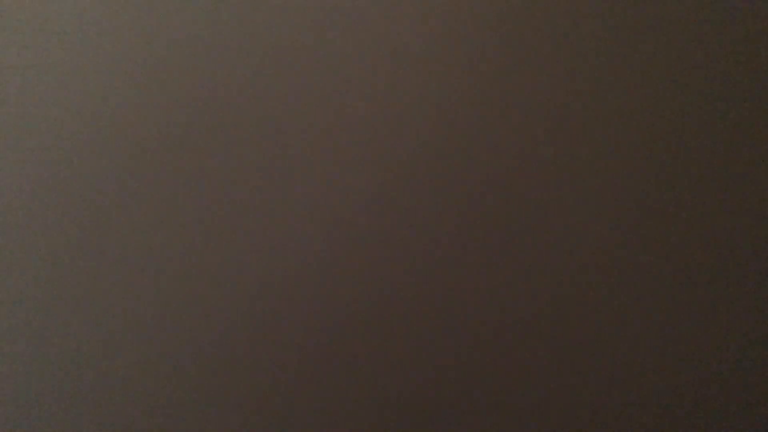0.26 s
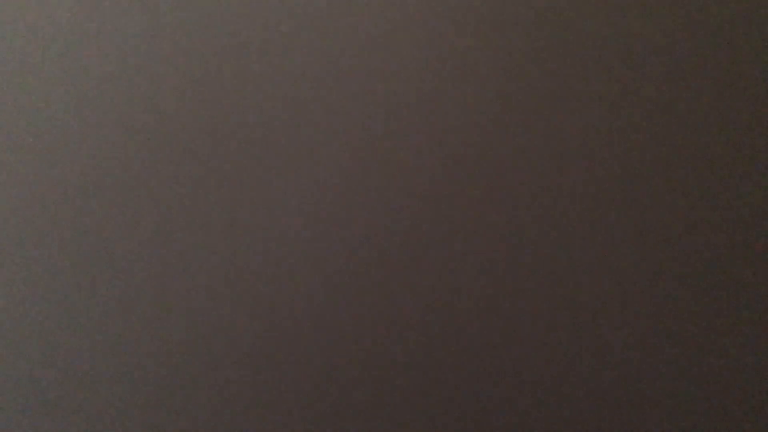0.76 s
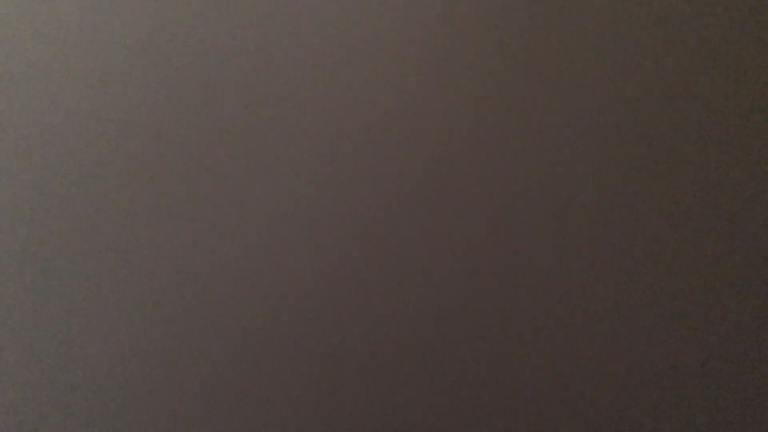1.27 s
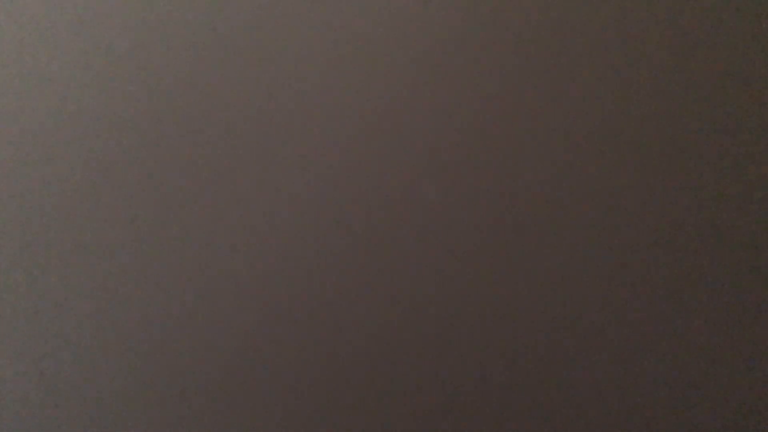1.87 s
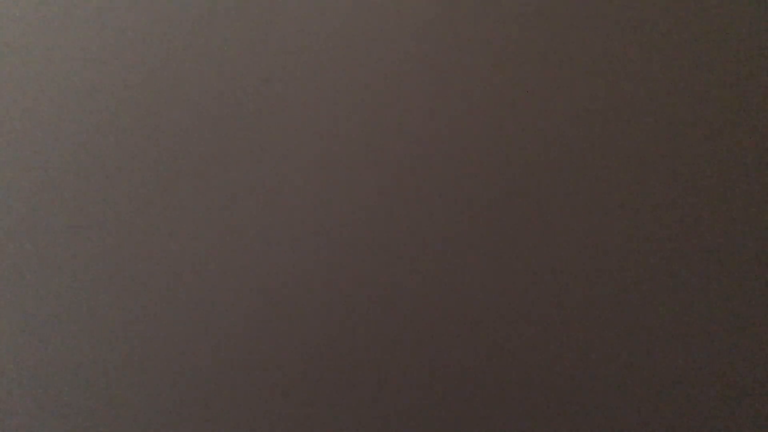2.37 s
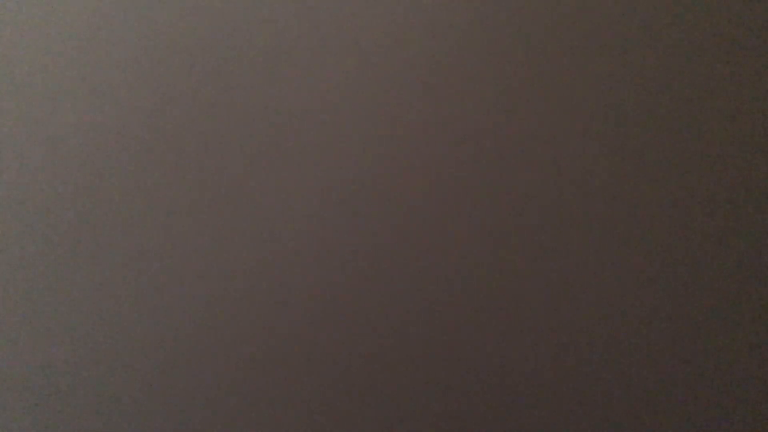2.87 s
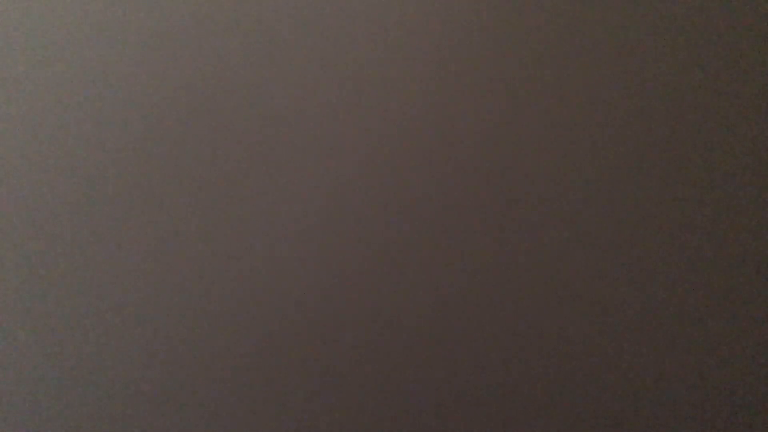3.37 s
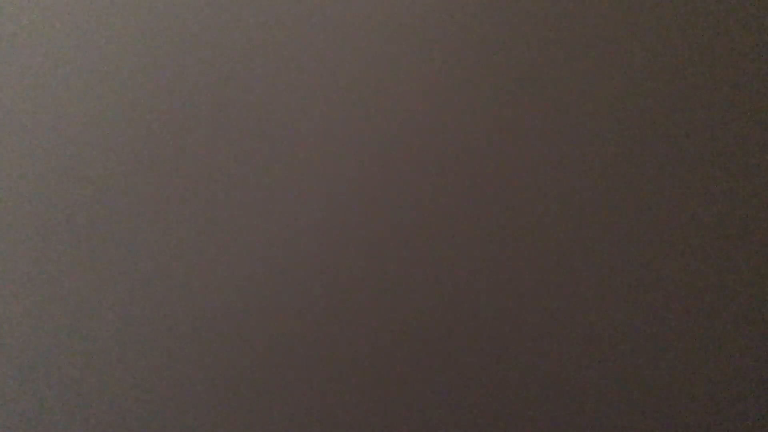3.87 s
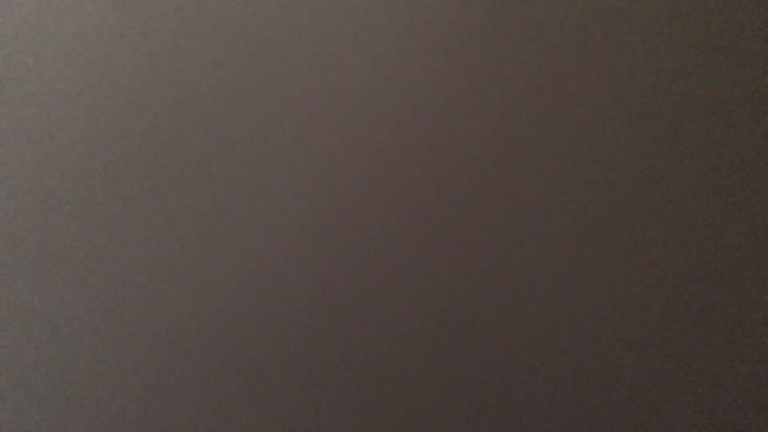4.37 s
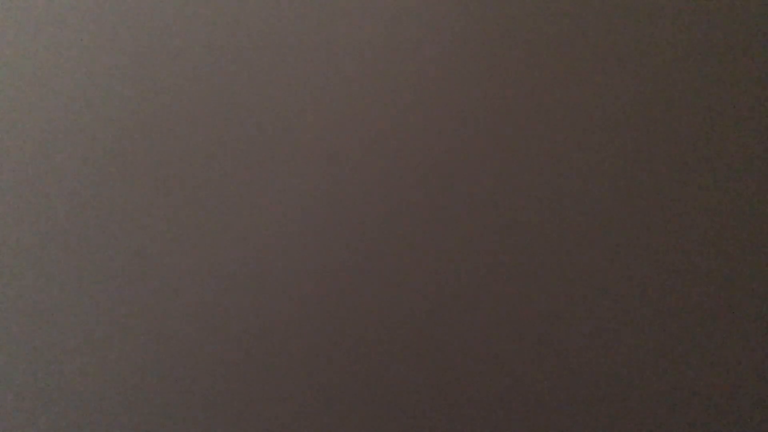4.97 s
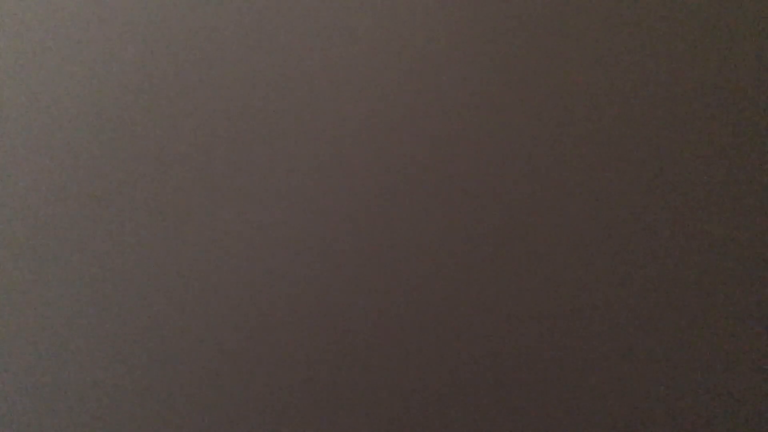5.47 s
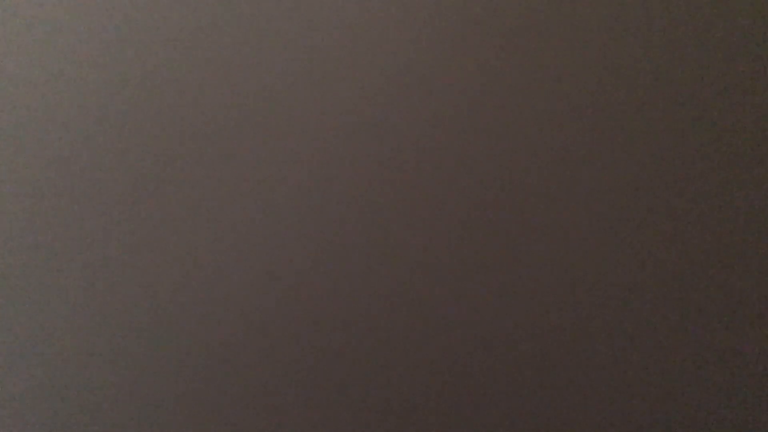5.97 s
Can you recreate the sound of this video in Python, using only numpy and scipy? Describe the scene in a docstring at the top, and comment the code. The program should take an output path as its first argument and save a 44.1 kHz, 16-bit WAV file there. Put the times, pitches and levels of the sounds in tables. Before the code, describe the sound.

Close to the microphone in a quiet small room, two tiny ticks precede a hard, loud snap as a plastic case's catch lets go, with a low thump and brief bright ring. Faint ticks and soft rubbing follow. Later a sharp crack starts busier handling: crinkling wrap, hollow knocks, finger drags, short squeaks and a dense cluster of clicks, ending in rubbing, scraping and soft thuds.

```python
"""Two faint ticks in the still air of a small room, then a hard snap: the catch of a plastic disc case lets go,
close to the microphone, and its shell flexes. Then hands work at it: thin wrap crinkles, fingers drag and
squeak over the shell, and its edges tick, scrape and knock. Cracks are pulses coloured by the hollow shell;
wrap and skin are swarms of such slips with noise; the panels are gliding tones and low rumble.
Diffuse echoes place the case in the room."""
import sys
import numpy as np
from scipy import signal
from scipy.fft import rfft, irfft
from scipy.io import wavfile
from scipy.ndimage import uniform_filter1d

SR = 44100
rng = np.random.default_rng(int(sys.argv[2]) if len(sys.argv) > 2 else 0)


def bounce(signal):
    """Save signal as a 16-bit WAV file at the path given by the first command-line argument."""
    frames = np.transpose(np.atleast_2d(signal))
    limited = np.clip(frames, -1, 1)
    pcm = np.round(limited * 32767).astype(np.int16)
    wavfile.write(sys.argv[1], SR, pcm)


N = 275071
TIME = np.arange(N) / SR

# Colour of the still air in the room. Each row: frequency in Hz, relative level in dB.
AIR_COLOUR = [(15, -0.5), (42, -10.5), (96, 6), (170, -10.5), (330, -17.5), (480, -20.5), (650, -16.5),
              (800, -21), (2000, -24.5), (9000, -34.5), (16000, -37)]
AIR_DB = -63
# Decay of the room. Each row: frequency in Hz, time to fall by 60 dB in seconds.
ROOM_DECAY = [(150, 0.2), (700, 0.4), (3000, 0.39), (6000, 0.45), (15000, 0.41)]
WALL_MIX_S = 0.19  # by then the echoes have grown fully dense

# Resonances of the hollow case. Each row: frequency in Hz, width in Hz, relative level in dB.
SHELL_RESONANCES = [(260.3, 250, 2.5), (610, 77, 9), (666, 23, 11), (990, 140, 4), (1228, 150, 1.5),
                    (1676, 51, 2), (2240, 390, 1.5), (3285, 150, 6.5), (3930, 260, 6.5), (5860, 600, 3.5)]
GRIP_DETUNE = 0.036  # the changing grip moves the resonances by this share
FOCUS_DB, FOCUS_OCTAVES = 8.5, 0.32  # each spot of the plastic favours its own band
BEND_LAG_S = 0.000819  # travel time of a 900 Hz bending wave across the panel

# Colours of the sounds at the case. Each row: frequency in Hz, relative level in dB.
SNAP_COLOUR = [(100, -26.5), (270, 2), (430, -12), (1300, -5), (2000, -2.5), (3600, -1), (6300, -6),
               (8000, -11.5), (12000, -15.5), (16000, -26.5)]
CLICK_COLOUR = [(60, -16), (270, 9), (430, 12.5), (800, 11), (2000, 8.5), (3000, 0.5), (6000, -9),
                (9000, -14), (12500, -14), (16000, -19)]
WRAP_COLOUR = [(200, -13.5), (900, 11.5), (2000, 5), (3800, 4.5), (5000, -0.5), (7000, -3.5), (9000, -0.5),
               (10300, -9.5), (12000, -3.5), (16000, -43)]
DRAG_COLOUR = [(80, -3), (300, 3.5), (430, -3.5), (650, 0), (950, -2), (1350, -7.5), (2200, -13),
               (4000, -22.5), (12000, -36)]
FLEX_COLOUR = [(15, -39), (28, -6), (42, 3.5), (75, 0.5), (130, -1), (200, -10.5), (300, -14), (450, -24),
               (1000, -33.5), (4000, -71)]

# The held case: a slight steady stir.
HOLD_FROM_S, HOLD_FLEX_DB = 0.65, -65.5
RATTLE_PER_S, RATTLE_DB = 14, -73

# Squeezes that bend the panels. Each row: start in seconds, length in seconds, level in dB.
SQUEEZES = [(0.69, 0.29, -43.5), (1.63, 0.026, -49), (2.765, 0.08, -47), (2.985, 0.17, -45.5),
            (3.34, 0.035, -49), (3.51, 0.086, -46), (3.72, 0.12, -44.5), (4.09, 0.029, -37.5),
            (4.9, 0.085, -46), (5.25, 0.021, -38), (5.47, 0.37, -50.5), (6.16, .08, -43.5)]
SQUEEZE_ATTACK_S, SQUEEZE_RELEASE_S = 0.0074, 0.083
# The shell flexing like a drum skin. Each row: start in seconds, peak level in dB, first pitch in Hz,
# last pitch in Hz, rise in seconds, time to fall by 60 dB in seconds.
THUMPS = [(0.476, -10, 135, 92, 0.014, 0.014), (0.483, -24, 81.5, 80, 0.0024, 0.21),
          (0.483, -25.5, 45.2, 44, 0.015, 0.27), (0.757, -27.5, 42, 40, 0.073, 0.35),
          (1.075, -30.5, 91, 63, 0.012, 0.049), (1.237, -32, 110, 81, 0.008, 0.036),
          (1.635, -39.5, 206.6, 129.4, 0.014, 0.65), (1.668, -32.5, 107, 72, 0.03, 0.34),
          (1.812, -38, 72, 51.8, 0.012, 0.55), (3.514, -36.5, 133, 129.6, 0.0063, 0.22),
          (3.705, -24, 156.4, 85, 0.026, 0.042), (3.752, -31, 69, 53, 0.019, 0.12),
          (4.099, -28.5, 144, 110, 0.0063, 0.24), (4.898, -27, 59, 54, 0.015, 0.11),
          (5.454, -32.5, 198, 122, 0.012, 0.039), (6.197, -28.5, 143, 96, 0.017, 0.043)]
# Short hollow notes of the shell: soft pushes of a finger pad, and the low body under the cracks at # 1.18,
# 2.77, 3.0 and 5.28 s. Each row: start in seconds, peak level in dB, pitch in Hz.
HOLLOW_NOTES = [(1.178, -38, 227), (1.277, -45, 705), (1.64, -51.5, 319), (1.864, -52, 655), (1.88, -51.5, 672),
                (1.978, -47, 637), (2.041, -48, 860), (2.211, -54, 672), (2.251, -56, 660), (2.6, -73, 680),
                (2.765, -33, 253), (2.849, -37, 662), (3, -42.5, 425), (3.356, -44, 630), (3.571, -38, 610),
                (5.282, -34.5, 305), (5.307, -42.5, 957), (5.348, -43.5, 1028), (5.377, -44, 775),
                (5.407, -41.5, 650), (5.529, -37.5, 935), (5.546, -34, 663), (5.684, -32.5, 661),
                (5.745, -35.5, 672), (5.787, -40, 700), (5.92, -39, 633), (6.131, -39.5, 747), (6.2, -33, 667)]
NUDGE_RISE_S, NUDGE_OVERTONE_DB = 0.0049, -18  # each overtone, against the note

# Soft taps on the hollow shell. Each row: start in seconds, level in dB over the first 4 ms,
# brightness in dB per octave, favoured band in Hz.
KNOCKS = [(1.0726, -44.5, 4.5, 1390), (1.1789, -35.5, -2.5, 1310), (2.7705, -42, -18, 607),
          (3.5231, -37.5, -1, 1090), (3.7041, -38, -3.5, 590), (4.8837, -32.5, 2.5, 895),
          (5.4572, -36, -14, 1040), (5.5069, -38, -5, 1010), (5.5769, -38, -2, 910)]
# Strokes of a finger over the shell. Each row: start in seconds, length in seconds, level in dB.
RUBS = [(0.85, 0.17, -62), (1.185, 0.054, -53.5), (1.975, 0.087, -63.5), (2.56, 0.51, -67),
        (2.78, 0.083, -59.5), (2.995, 0.008, -39), (3.05, 0.089, -49), (3.23, 0.19, -53.5),
        (3.955, 0.16, -52.5), (4.09, 0.032, -48.5), (4.265, 0.2, -52.5), (4.55, 0.082, -48.5),
        (4.68, 0.12, -40), (4.87, 0.14, -48), (5.1, 0.28, -62.5), (5.279, 0.039, -47.5), (5.34, 0.049, -51),
        (5.45, 0.081, -52.5), (5.505, 0.31, -51), (5.88, 0.45, -47.5)]
RUB_ATTACK_S, RUB_RELEASE_S = 0.0011, 0.036  # the finger takes hold; the slipping dies away by 1 / e
FLEX_PER_RUB_DB, WRAP_PER_RUB_DB = -5, -12.5  # every stroke also shakes the panels and stirs the wrap
FIT_S, FIT_DB = 0.012, 4.5  # wrap and fingers give way in fits of about this length, with lulls between

# A brief scuff starts just before a tap, crack or nudge; its level is against that hit.
SCUFF_LEAD_S, SCUFF_S = 0.008, 0.02
SCUFF_RISE_S, SCUFF_FALL_S = 0.004, 0.013
KNOCK_SCUFF_DB, CLICK_SCUFF_DB, NUDGE_SCUFF_DB = -9.5, -28, -15.5

# A skidding fingertip squeaks. Each row: start in seconds, length in seconds, level in dB,
# first pitch in Hz, last pitch in Hz.
SQUEAKS = [(3.228, 0.061, -50.5, 636, 1810), (4.867, 0.032, -40, 857, 926),
           (5.339, 0.0557, -44.5, 1023, 717)]
SQUEAK_WIDTH_HZ = 370
# Edges scraping over the plastic. Each row: start in seconds, length in seconds, level in dB, band in Hz.
SCRAPES = [(0.763, 0.3, -69.5, 4760), (1.163, 0.0048, -57, 1230), (1.223, 0.0095, -47.5, 1940),
           (2.01, 0.18, -74.5, 4040), (4.281, 0.16, -59.5, 1710), (4.564, 0.083, -56, 2100),
           (4.696, 0.064, -55, 1050), (4.951, 0.031, -50.5, 2680), (5.281, 0.0085, -57, 3180),
           (5.449, 0.067, -51, 1190), (5.975, 0.091, -51.5, 1550), (6.196, 0.034, -51.5, 1890)]
SCRAPE_ATTACK_S, SCRAPE_RELEASE_S = 0.007, 0.001
SCRAPE_PER_S, SCRAPE_SPREAD_DB = 1100, 1  # mean rate of the catches and scatter of their strength
SCRAPE_WIDTH = 0.35  # half-width of the band as a share

# Spells of crumpling the wrap. Each row: start in seconds, length in seconds, level in dB.
CRUMPLES = [(0.72, 0.24, -76), (2.77, 0.21, -63.5), (3.0, 0.2, -58.5), (3.18, 0.17, -65.5),
            (3.91, 0.044, -61.5), (4.115, 0.076, -59), (4.3, 0.29, -55.5), (4.575, 0.25, -57.5),
            (4.945, 0.102, -54.5), (5.52, 0.21, -68), (6.0, 0.074, -58.5), (6.09, 0.27, -62)]
CRUMPLE_ATTACK_S, CRUMPLE_RELEASE_S = 0.00072, 0.004
BUCKLE_PER_S, BUCKLE_DB = 70, 2.5  # the few larger creases; level against the many tiny ones
# Sharp ticks and cracks of the plastic. Each row: start in seconds, level in dB over the first 4 ms,
# brightness in dB per octave, favoured band in Hz.
CLICKS = [(0.2398, -58, 4.5, 3500), (0.3155, -56.5, -0.5, 4800.0), (0.6804, -50.5, 6, 6560),
          (0.7029, -48, 9, 4700), (0.8347, -55.5, 4, 4120), (1.0355, -54.5, 3.5, 4800.0),
          (1.1675, -49.5, 1, 5800), (1.2042, -48.5, 1, 6000), (1.7777, -58.5, 3, 5660),
          (2.0588, -55.5, 4.5, 3990), (2.0773, -52, 4.5, 4870), (2.362, -61, 4, 4020),
          (2.3852, -59.5, 4, 9100), (2.7676, -28, 2, 9230), (2.7775, -45, 6, 6000),
          (2.8479, -43.5, 1, 1280), (2.8976, -46.5, 2.5, 3440), (2.9991, -31.5, 3, 1740),
          (3.0095, -35, 3.5, 5100), (3.0154, -37, 0.5, 5740), (3.1128, -47, 12, 1430.0),
          (3.138, -47.5, 11, 7100), (3.4676, -49.5, 7, 710.0), (3.6612, -49.5, 1, 3500),
          (3.8538, -41.5, 3.5, 4730), (3.9883, -38.5, 2, 2000), (4.0324, -49.5, 7.5, 9800),
          (4.0935, -29, 1.5, 1000), (4.1187, -27.5, 6.5, 680), (4.1251, -27, 7, 840),
          (4.1406, -34.5, 4.5, 673), (4.1832, -41.5, 6, 9500), (4.232, -45, -1, 3300),
          (4.27, -38.5, 2.5, 1220), (4.3226, -43, 5, 840), (4.3277, -44.0, 4, 9500),
          (4.3465, -49, -3.5, 1800), (4.3765, -40, -7, 1200), (4.4355, -43, 4.5, 600.0),
          (4.4791, -42, 3, 706), (4.5528, -46.5, 8, 1400), (4.5997, -39.5, 3.5, 3960),
          (4.6455, -39.5, 5, 2520), (4.6578, -33, -2.5, 1000), (4.7503, -32, 6, 1000),
          (4.8082, -30, 4, 1180), (4.8674, -42, 1, 850.0), (4.9487, -38.5, 1, 1940),
          (5.0347, -38, -1.5, 5850), (5.2834, -40.5, -1.5, 3800), (5.8605, -46, -0.5, 3400),
          (5.873, -43, -0.5, 1400)]
# The catch letting go. Each row: start in seconds, level in dB over the first 4 ms,
# brightness in dB per octave, favoured band in Hz.
SNAP = [(0.4725, -19, -1, 2340), (0.476, -24, -14.5, 1400), (0.4824, -38, -1.5, 3000),
        (0.4863, -43, 5, 5500), (0.491, -35.5, -7.5, 3200), (0.495, -38.5, 9, 7000)]
# The freed halves ring on. Each row: frequency in Hz, peak level in dB.
SNAP_RING = [(950, -62.5), (2708, -55.5), (2849, -50.5), (3699, -54.5), (3979, -59.5), (5269, -49),
             (5993, -55), (6422, -50.5), (9075, -51.5)]
SNAP_RING_T60_S = 0.35

TOP_HZ = 15900  # upper limit of the recorder


def undb(db):
    """Decibels to gain."""
    return 10 ** (np.asarray(db) / 20)


def unit(x):
    """Scale to rms 1."""
    return x / np.sqrt(np.mean(x ** 2))


def across(points, hz):
    """Read (Hz, value) points on a log-frequency axis."""
    f, value = np.transpose(points)
    return np.interp(np.log(hz + 1), np.log(f), value)


def add(out, s, sound):
    """Mix a sound in at time s."""
    i = int(s * SR)
    out[i:i + len(sound)] += sound[:max(N - i, 0)]


def noise(colour):
    """Steady noise of a given colour, rms 1."""
    spectrum = rfft(rng.standard_normal(N))
    gain = undb(across(colour, np.fft.rfftfreq(N, 1 / SR)))
    return unit(irfft(spectrum * gain, N))


def swell_and_fade(t, length_s, attack_s, release_s):
    """A contact that takes hold, stays for length_s from its start, and dies away by 1 / e in release_s."""
    return np.minimum(t / attack_s, 1) * np.exp(-np.maximum(t - length_s, 0) / release_s)


def gestures(table, attack_s, release_s):
    """Strength of the hand's moves (start s, length s, dB); overlapping moves add in power."""
    power = np.zeros(N)
    for s, length_s, db in table:
        shape = swell_and_fade(TIME[:SR], length_s, attack_s, release_s)
        add(power, s, (undb(db) * shape) ** 2)
    return np.sqrt(power)


def scuffs(table, scuff_db):
    """Level of the sliding contact around each row (s, dB, ..) of a table of hits."""
    moves = [(s - SCUFF_LEAD_S, SCUFF_S, db + scuff_db) for s, db, *_ in table]
    return gestures(moves, SCUFF_RISE_S, SCUFF_FALL_S)


def holding(db):
    """Slight steady stir of the case while it is held."""
    return undb(db) * (TIME > HOLD_FROM_S)


def fits():
    """Uneven strength of a yielding or slipping contact, rms 1."""
    chance = unit(uniform_filter1d(rng.standard_normal(N), size=int(FIT_S * SR)))
    return unit(undb(FIT_DB * np.clip(chance, -2, 1)))


def shell_ring(hz, ring_db):
    """Each spot wakes the shell's resonances in another mix, and the grip detunes them."""
    mix = 2 * rng.random(len(SHELL_RESONANCES))
    detune = 1 + GRIP_DETUNE * rng.standard_normal(len(SHELL_RESONANCES))
    ring = np.zeros(len(hz), complex)
    for share, shift, (f, width_hz, db) in zip(mix, detune, SHELL_RESONANCES):
        ring += share * undb(db + ring_db) / (1 + 2j * (hz - f * shift) / width_hz)
    return ring


def crack(colour, tilt_db, focus_hz, fray_s, fray_db, ring_db, focus_db=FOCUS_DB, size=4096):
    """One sudden slip of plastic: a pulse, a brief spray of smaller slips, and the ring of the shell."""
    hz, t = np.fft.rfftfreq(size, 1 / SR), np.arange(size) / SR
    spray = rng.standard_normal(size) * np.exp(-t / fray_s)
    push = undb(fray_db) * spray / np.linalg.norm(spray)
    push[0] += 1
    # a harder contact tips the colour towards the treble; the spot that gives lifts its own band
    octaves_off = np.log2((hz + 1) / focus_hz)
    db = across(colour, hz) + tilt_db * np.log2(np.clip(hz, 900, 8000) / 2000)
    db = db + focus_db * np.exp(-.5 * (octaves_off / FOCUS_OCTAVES) ** 2)
    cepstrum = irfft(np.log(undb(db)))
    cepstrum[1:size // 2] *= 2  # folded to minimum phase, so the colour does not sound before the slip
    cepstrum[size // 2 + 1:] = 0
    # bending waves spread in the panel: the treble arrives first, the lows follow
    lag_s = BEND_LAG_S * np.sqrt(1000 / (hz + 100))
    spread = np.exp(-2j * np.pi * np.cumsum(lag_s) * SR / size)
    fade = np.cos(np.pi / 2 * t / t[-1]) ** 2
    return fade * irfft(rfft(push) * np.exp(rfft(cepstrum)) * spread * (1 + shell_ring(hz, ring_db)))


def strikes(table, colour, fray_s, fray_db, ring_db, focus_db=FOCUS_DB):
    """One crack for each row (s, dB, brightness, favoured Hz) of a table."""
    out = np.zeros(N)
    for s, db, tilt_db, focus_hz in table:
        sound = crack(colour, tilt_db, focus_hz, fray_s, fray_db, ring_db, focus_db)
        onset_rms = np.sqrt(np.mean(sound[:SR // 250] ** 2))  # first 4 ms
        add(out, s, undb(db) * sound / onset_rms)
    return out


def grains(colour, rate, spread_db, fray_s, ring_db, tilt_spread_db, count=10):
    """A swarm of slips of uneven size from several spots, rms 1."""
    out = np.zeros(N)
    spots_hz = rng.permutation(np.geomspace(400, 12000, count))
    tilts_db = np.linspace(-1, 1, count) * tilt_spread_db
    slips_per_spot = int(rate * N / SR / count)
    for tilt_db, focus_hz in zip(tilts_db, spots_hz):
        slip = unit(crack(colour, tilt_db, focus_hz, fray_s, 3.6, ring_db))
        for when, strength, side in rng.random((slips_per_spot, 3)):
            db = spread_db * min(-np.log(1 - strength), 3)  # many small, few large
            add(out, when * N / SR, np.sign(side - .5) * undb(db) * slip)
    return unit(out)


def still_air():
    """Steady noise of the air in the room, behind everything."""
    return undb(AIR_DB) * noise(AIR_COLOUR)


def room(x, delay_s=0.00048):
    """Diffuse echo of a small room: echoes crowd together and each octave decays at its own rate."""
    t = TIME[:SR // 2]
    density = np.clip((t / WALL_MIX_S) ** 2, .01, 1)
    present = rng.random(len(t)) < density
    echoes = np.sign(rng.standard_normal(len(t))) * present / np.sqrt(density)
    hz, spectrum = np.fft.rfftfreq(len(t), 1 / SR), rfft(echoes)
    tail = np.zeros(len(t))
    for low in 2 ** np.arange(7, 15):  # octaves from 128 Hz up
        band = irfft(spectrum * ((hz >= low) & (hz < 2 * low)), len(t))
        tail += band * np.exp(-np.log(1000) * t / across(ROOM_DECAY, low * np.sqrt(2)))
    tail *= t > delay_s
    return signal.oaconvolve(x, tail / np.linalg.norm(tail))[:N]


def rattle():
    """The loose halves tap together faintly while the case is held."""
    taps = grains(DRAG_COLOUR, rate=RATTLE_PER_S, spread_db=3, fray_s=.003, ring_db=6,
                  tilt_spread_db=1, count=6)
    return holding(RATTLE_DB) * taps


def shell_flex(rubbing):
    """The broad panels rumble in the grip and thump as they give, sinking in pitch as they slacken."""
    squeezing = gestures(SQUEEZES, SQUEEZE_ATTACK_S, SQUEEZE_RELEASE_S)
    grip = np.hypot(np.hypot(squeezing, undb(FLEX_PER_RUB_DB) * rubbing), holding(HOLD_FLEX_DB))
    out = grip * noise(FLEX_COLOUR)
    t = TIME[:SR // 2]
    for s, db, first_hz, last_hz, rise_s, t60 in THUMPS:
        decay = np.exp(-np.log(1000) * np.maximum(t - rise_s, 0) / t60)
        swell = np.minimum(t / rise_s, 1) ** 2 * decay
        hz = last_hz + (first_hz - last_hz) * np.exp(-(t / rise_s) ** 2)
        # a panel that gives slowly does so in jerks
        jerks = unit(uniform_filter1d(rng.standard_normal(len(t)), size=400)) * min(rise_s / .03, 1)
        phase = 2 * np.pi * np.cumsum(hz * (1 + .18 * jerks)) / SR
        add(out, s, undb(db) * swell * np.sin(phase))
    return out


def hollow_notes():
    """A soft push, or the low body of a crack, swells and fades in one short hollow note, with weak overtones
    that vary by spot."""
    out, t = np.zeros(N), TIME[:SR // 10]
    swell = (t / NUDGE_RISE_S) ** 2 * np.exp(2 - 2 * t / NUDGE_RISE_S)
    for s, db, hz in HOLLOW_NOTES:
        overtones = rng.uniform(1.3, 2.3, 3) * hz
        upper = sum(np.sin(2 * np.pi * f * t) for f in overtones)
        note = np.sin(2 * np.pi * hz * t) + undb(NUDGE_OVERTONE_DB) * upper
        add(out, s, undb(db) * swell * note)
    return out


def knocks():
    """Fingertips and loose edges tap the hollow shell, whose resonances ring strongly."""
    return strikes(KNOCKS, DRAG_COLOUR, fray_s=0.0025, fray_db=1.5, ring_db=4)


def drag(rubbing):
    """Fingers stick and slip on the shell, over the even hiss of sliding skin."""
    slips = grains(DRAG_COLOUR, rate=420, spread_db=4, fray_s=.002, ring_db=-4, tilt_spread_db=2, count=48)
    scuffing = np.hypot(scuffs(KNOCKS, KNOCK_SCUFF_DB), scuffs(HOLLOW_NOTES, NUDGE_SCUFF_DB))
    return np.hypot(rubbing, scuffing) * unit(slips * fits() + .5 * noise(DRAG_COLOUR))


def squeaks():
    """A skidding fingertip chatters roughly: a narrow band of noise around a gliding pitch."""
    out = np.zeros(N)
    smooth = signal.butter(2, SQUEAK_WIDTH_HZ / 2, fs=SR, output="sos")
    in_phase, quadrature = (unit(signal.sosfilt(smooth, row)) for row in rng.standard_normal((2, N)))
    for s, length_s, db, first_hz, last_hz in SQUEAKS:
        during = (TIME >= s) & (TIME < s + length_s)
        progress = (TIME[during] - s) / length_s
        phase = 2 * np.pi * np.cumsum(first_hz * (last_hz / first_hz) ** progress) / SR
        chatter = in_phase[during] * np.cos(phase) + quadrature[during] * np.sin(phase)
        add(out, s, undb(db) * np.sin(np.pi * progress) * chatter)
    return out


def scrapes():
    """An edge judders over the plastic in uneven catches, each scrape in its own band."""
    out, t = np.zeros(N), TIME[:SR // 2]
    for s, length_s, db, hz in SCRAPES:
        caught = rng.random(len(t)) < SCRAPE_PER_S / SR
        scatter = np.clip(rng.standard_normal(len(t)), -2, 2)
        catches = caught * undb(SCRAPE_SPREAD_DB * scatter)
        edges_hz = [hz / (1 + SCRAPE_WIDTH), hz * (1 + SCRAPE_WIDTH)]
        band = signal.butter(2, edges_hz, "band", fs=SR, output="sos")
        shape = swell_and_fade(t, length_s, SCRAPE_ATTACK_S, SCRAPE_RELEASE_S)
        add(out, s, undb(db) * shape * unit(signal.sosfilt(band, catches)))
    return out


def crinkle(rubbing):
    """Thin wrap buckles in many tiny creases and a few larger ones; a sliding finger only rustles it finely."""
    creases = grains(WRAP_COLOUR, rate=520, spread_db=6, fray_s=.0006, ring_db=-14,
                     tilt_spread_db=3.5, count=40)
    buckles = grains(CLICK_COLOUR, rate=BUCKLE_PER_S, spread_db=3, fray_s=.0011, ring_db=-9,
                     tilt_spread_db=6, count=24)
    crumpling = gestures(CRUMPLES, CRUMPLE_ATTACK_S, CRUMPLE_RELEASE_S)
    sliding = np.hypot(undb(WRAP_PER_RUB_DB) * rubbing, scuffs(CLICKS, CLICK_SCUFF_DB))
    crumpled = crumpling * fits() * (creases + undb(BUCKLE_DB) * buckles)
    return crumpled + sliding * unit(creases + noise(WRAP_COLOUR))


def clicks():
    """Creases and edges of the plastic crack in short, sudden slips."""
    return strikes(CLICKS, CLICK_COLOUR, fray_s=.0013, fray_db=1, ring_db=-9)


def snap():
    """The catch breaks free with a hard crack, the halves chatter and ring on, and the room answers."""
    direct = strikes(SNAP, SNAP_COLOUR, fray_s=0.0031, fray_db=-2.5, ring_db=-16, focus_db=2.5)
    t = TIME[:SR // 2]
    decay = np.exp(-np.log(1000) * t / SNAP_RING_T60_S)
    for hz, db in SNAP_RING:
        add(direct, SNAP[0][0], undb(db) * decay * np.sin(2 * np.pi * hz * t))
    # the walls hear the whole shell at once, so its resonances even out
    radiated = strikes(SNAP, SNAP_COLOUR, fray_s=.001, fray_db=-30, ring_db=-25, focus_db=0)
    return direct + room(undb(-12.5) * radiated)


def scene():
    """The case close by, its echo, and the still air of the room."""
    rubbing = gestures(RUBS, RUB_ATTACK_S, RUB_RELEASE_S)
    ticks = clicks() + knocks() + hollow_notes() + rattle()
    rustle = drag(rubbing) + crinkle(rubbing) + scrapes() + squeaks()
    flex = shell_flex(rubbing)
    echo = room(undb(-8.0) * (ticks + rustle) + undb(-6.0) * flex)
    return (snap() + ticks + rustle + flex + echo + still_air())[None]


def record(dry):
    """The microphone sheds the deepest bass and the recorder cuts the top."""
    lean = signal.sosfilt(signal.butter(4, 32, "high", fs=SR, output="sos"), dry)
    return signal.sosfilt(signal.ellip(8, .2, 70, TOP_HZ, fs=SR, output="sos"), lean)


dry = scene()
out = record(dry)
bounce(out)
```